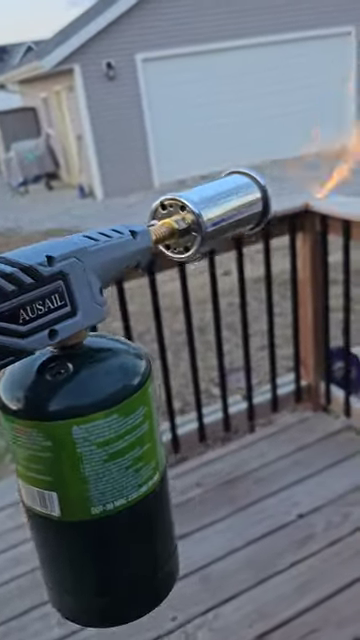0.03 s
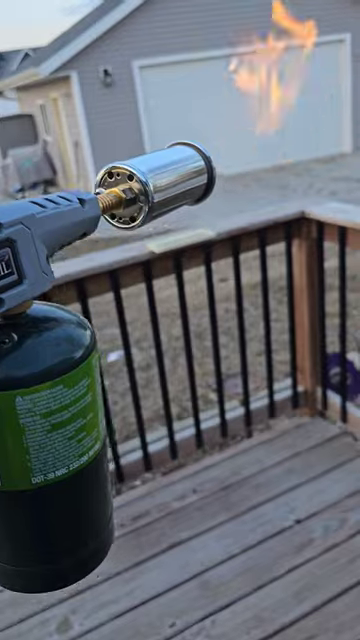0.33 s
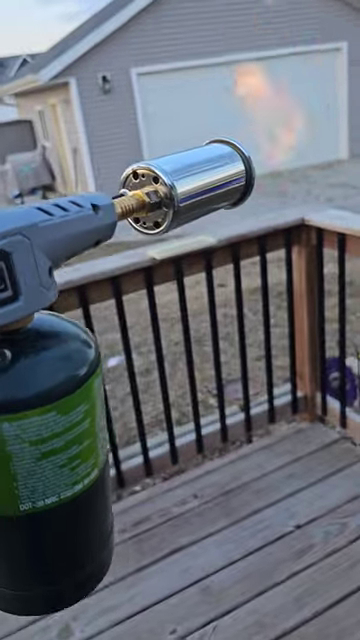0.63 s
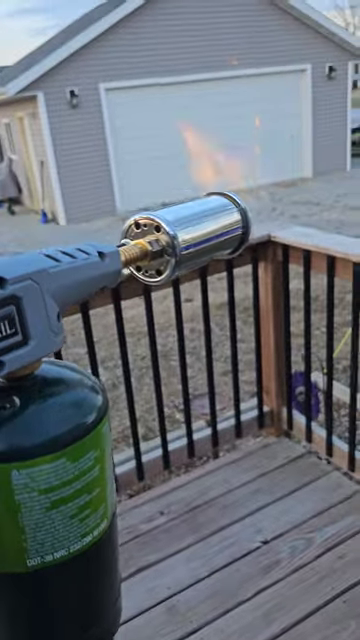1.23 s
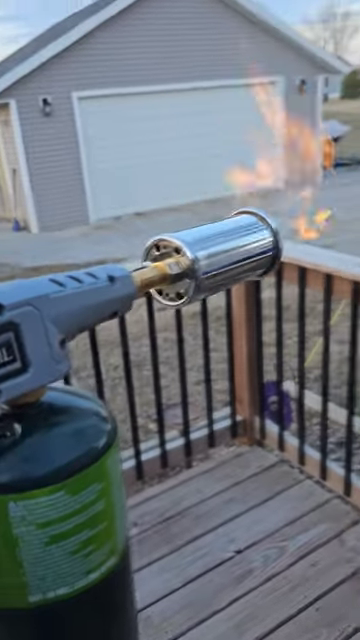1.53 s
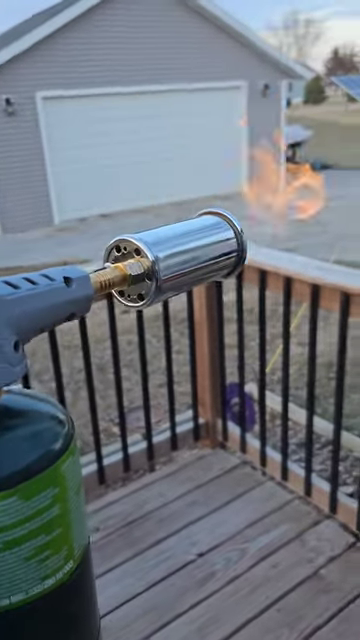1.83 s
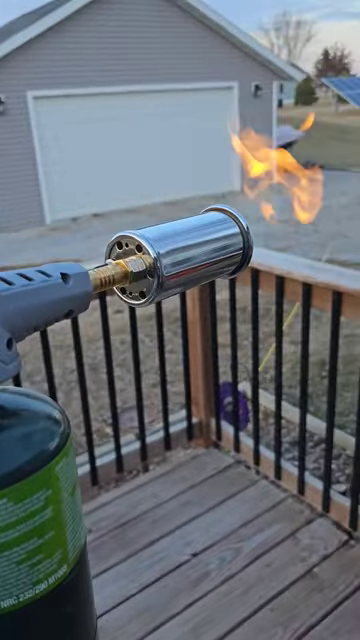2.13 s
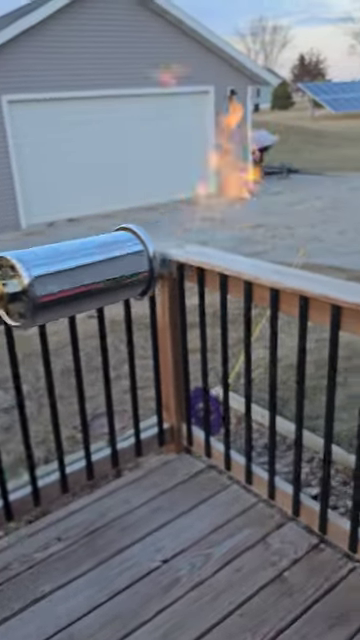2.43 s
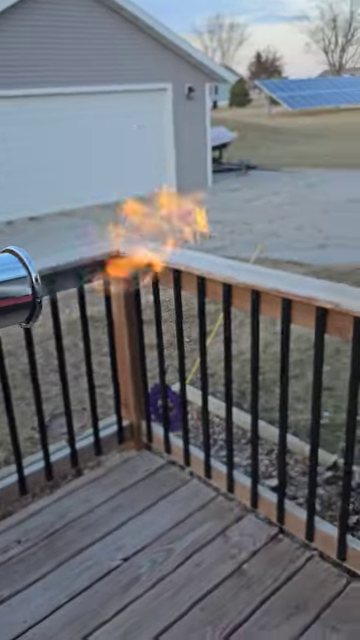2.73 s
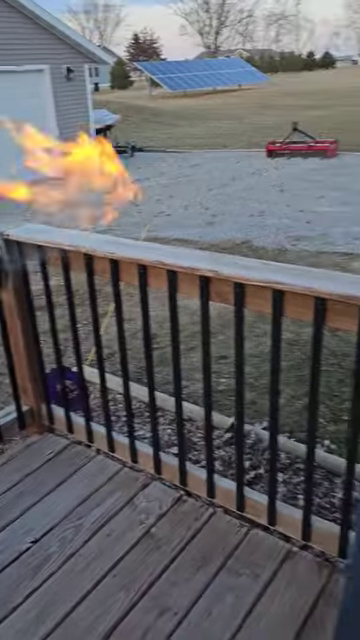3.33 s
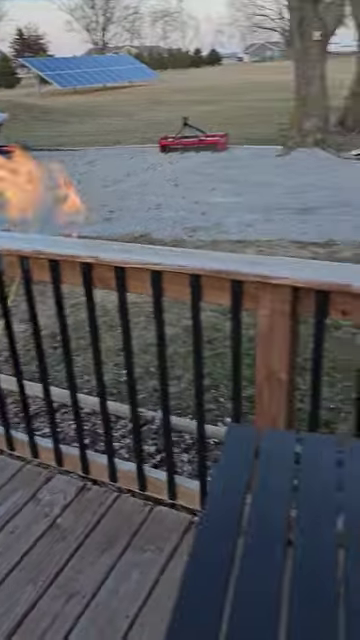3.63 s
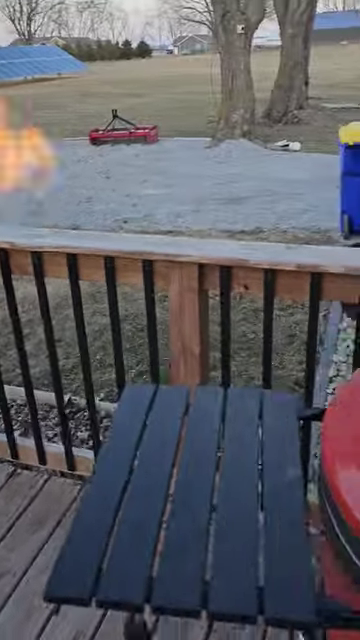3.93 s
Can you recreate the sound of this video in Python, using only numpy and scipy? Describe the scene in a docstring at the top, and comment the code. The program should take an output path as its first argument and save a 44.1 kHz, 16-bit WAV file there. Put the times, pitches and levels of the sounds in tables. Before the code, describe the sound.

A gas torch flame roars and flutters steadily on an open deck, popping softly now and then. Its jet hisses with a slight steel ring, growing brighter on the right as the microphone moves around it up close.

```python
"""Propane torch on a deck

A hand-held torch burns steadily in the open. The loose flame roars and flutters, with a small pop
now and then; on top, the gas jet hisses and rings the steel burner tube, and the boards add a faint
reflection. The microphone starts beside the burner and swings round it, opening up the treble on the right."""
import sys
import numpy as np
from scipy.fft import rfft, irfft, next_fast_len
from scipy.io import wavfile
from scipy.ndimage import map_coordinates

SR = 44100
rng = np.random.default_rng(int(sys.argv[2]) if len(sys.argv) > 2 else 0)


def pcm_store(signal):
    """Save signal as 16-bit PCM."""
    levels = np.round(np.clip(np.atleast_2d(signal), -1, 1) * 32767)
    wavfile.write(sys.argv[1], SR, levels.astype(np.int16).T)


N = 176400


# Fader ride of the roar: t/s, relative level/dB
ROAR_RIDE = [(0, -27.5), (.68, -27), (.78, -24), (.88, -26.5), (1.03, -23), (1.35, -22.5), (1.55, -22.5),
             (1.75, -25.5), (1.96, -26), (2.04, -28.5), (2.12, -27), (2.42, -24.5), (2.58, -23),
             (2.73, -25), (2.79, -29.5), (2.84, -23.5), (2.95, -24.5), (3.1, -26.5), (3.35, -28),
             (3.45, -25.5), (3.54, -26), (3.62, -23.5), (3.73, -23.5), (3.81, -24), (3.88, -24),
             (3.93, -28.5), (4, -22)]
# EQ of the roar: f/Hz, relative level/dB
ROAR_EQ = [(20, -25), (40, -6), (62, -1.5), (82, 3), (118, -3.5), (150, 2.5), (215, -1), (250, -2),
           (280, -2), (350, -7.5), (430, -18.5), (700, -28.5), (1500, -31.5), (3000, -65)]

def flame_roar(flutter, trim_db=-1, flutter_db=0.97):
    """The loose flame gives the low end: a deep, fluttering rumble, almost mono."""
    ride_db, = curves(ROAR_RIDE)
    rumble = noise(lambda hz: amp(along(ROAR_EQ, hz)))
    return amp(ride_db + trim_db + flutter_db * flutter) * rumble


# Fader ride of the turbulence at the burner mouth: t/s, relative level/dB
RUSH_RIDE = [(0, -36), (.3, -37.5), (.62, -36.5), (.78, -34.5), (.9, -35), (1.1, -31), (1.55, -34.5),
             (2.05, -36.5), (2.4, -33), (2.7, -32), (3.2, -35.5), (3.7, -30.5), (4, -33)]
# EQ of the rush: f/Hz, relative level/dB
RUSH_EQ = [(150, -52), (350, -8), (450, 3), (500, -2.5), (580, 2.5), (720, 2), (900, -5), (1100, 0),
           (1400, -15), (1800, -14.5), (4000, -25)]
# Stereo placement of the rush: f/Hz, right minus left/dB
RUSH_BALANCE = [(300, 46), (460, 0.5), (600, -9), (900, -5), (1200, -0.5)]

def burner_rush(flutter, trim_db=-1, flutter_db=2.05):
    """Burning gas tears out of the burner mouth and fills the midrange."""
    ride_db, = curves(RUSH_RIDE)
    return amp(ride_db + trim_db + flutter_db * flutter) * panned_noise(RUSH_EQ, RUSH_BALANCE)


# Cue list of the pops: t/s, peak before panning/dB, f/Hz
POP_CUES = [(.767, -13.5, 200), (2.2326, -22, 760), (2.606, -21, 160), (2.715, -15, 150), (2.822, -15, 111),
            (3.176, -24, 1500), (3.734, -15, 146), (3.883, -12.5, 128)]

def flame_pops():
    """A pocket of gas ignites: one push and pull of air."""
    out, t = np.zeros(N), np.arange(N) / SR
    for cue_s, peak_db, hz in POP_CUES:
        phase = 2 * np.pi * hz * (t - cue_s)
        out -= amp(peak_db) * phase * np.exp((1 - phase ** 2) / 2)
    return out * pan(db=1)


# EQ of the hiss, beside the burner and swung round: f/Hz, relative level/dB
BESIDE_EQ = [(500, -11.5), (1450, -2.5), (1800, -9.5), (2250, -8.5), (2850, 2.5), (3300, -9.5),
             (4100, -0.5), (4650, -10.5), (5600, -8), (6800, -18), (7900, -12), (9000, -18), (10300, -17.5),
             (12000, -13), (13800, -36.0), (15500, -29.5)]
ROUND_EQ = [(500, -13), (1450, -6), (1800, -24), (2250, -5.5), (2850, 2.5), (3300, -4), (4100, -4),
            (4650, -20), (5600, -3.5), (6800, -10), (7900, -6), (9000, -7), (10300, -10), (12000, -13.5),
            (13800, -29), (15500, -30.5)]
# Stereo placement from the same two angles: f/Hz, right minus left/dB
BESIDE_BALANCE = [(2000, -3.5), (2900, 6), (4400, 9), (5600, 4), (7500, -6), (10000, -7), (15000, -6.5)]
ROUND_BALANCE = [(2000, 0.5), (2900, 4.3), (4400, 0.5), (5600, 6.6), (7500, 10), (10000, 5.8), (15000, 4.0)]

def jet_hiss(blend, beside_db=-38, round_db=-39):
    """The gas jet's colour depends on the angle: an equal-power crossfade of two perspectives."""
    beside = amp(beside_db) * panned_noise(BESIDE_EQ, BESIDE_BALANCE)
    around = amp(round_db) * panned_noise(ROUND_EQ, ROUND_BALANCE)
    return np.sqrt(1 - blend) * beside + np.sqrt(blend) * around


# Resonances of the steel tube: f/Hz, width/Hz
TUBE_MODES = [(1080,110), (1212,75), (1300,65), (2528,70), (3582,95), (3925,95), (4330,130), (4987,85),
              (5840,145), (6040,135), (6322,90), (7515,85), (8335,150), (8871,70), (9400,190), (9930,145),
              (10912,150), (11660,125), (12600,135), (13470,140), (14740,230)]
# How each one radiates: relative level/dB (beside, halfway, round), right minus left/dB (beside, round)
MODE_RADIATION = [(-48,-44,-41.5,-2,3), (-38.5,-38.5,-37,0,2.5), (-47.5,-50,-37,0,-1.5),
                  (-43.5,-41,-49.5,11,2), (-38.5,-46,-60,-4,-1), (-41.5,-42.5,-44.5,6,-2),
                  (-55,-51,-57,-7,-3), (-56.5,-49.5,-50,-5,7), (-46.5,-48,-59,-8.5,-3),
                  (-50,-44.5,-48.5,6,14), (-45,-53,-42,10,17), (-43.5,-48,-46,27,23), (-40,-55,-44.5,7,21),
                  (-50,-65,-50.5,1.5,8), (-48,-51,-52,0,13), (-58,-66,-66,-4,6), (-47,-61.5,-46.5,6,12),
                  (-56,-50.5,-54.5,-5,19), (-62,-64,-61,-3,1), (-59,-63,-66,-6,7), (-53,-62,-63,5,4)]

def tube_ring(swing, trim_db=-0.5, correlation=0.66, waver_db=1.1, waver_hz=5.9):
    """The jet keeps the tube's resonances ringing; each wavers and radiates in its own direction."""
    out = np.zeros((2, N))
    for (centre, width), (*levels_db, pan_beside, pan_round) in zip(TUBE_MODES, MODE_RADIATION):
        ring = noise(lambda hz: resonance(hz, centre, width), [(centre, correlation)])
        level_db = np.interp(swing, [0, .5, 1], levels_db) + waver_db * wobble(waver_hz)
        pan_db = pan_beside + swing ** 2 * (pan_round - pan_beside)
        out += ring * amp(trim_db + level_db) * pan(pan_db)
    return out


def resonance(hz, centre, width):
    """Gain of one tube resonance: a peak with steep skirts."""
    detune = (hz - centre) / width
    return 1 / np.sqrt((1 + (2 * detune) ** 2) * (1 + (detune / 2.5) ** 2))


def deck_reflection(pair, echo_s=.0033, echo_db=-16, sway_s=0.0002, sway_hz=0.78):
    """The boards add a weak copy to each side: a light comb filter that drifts as the hand sways."""
    echoes = [delayed(side, echo_s + sway_s * wobble(sway_hz)) for side in pair]
    return pair + amp(echo_db) * np.array(echoes)


# Stereo width of flame and hiss: f/Hz, left-right correlation (0 wide, 1 mono)
STEREO_CORRELATION = [(100, 1), (300, .98), (600, 0.69), (1200, 1), (2000, 0.73), (3800, 1), (5000, 0),
                      (7000, 0), (10000, 0), (15000, 0)]

def noise(response, correlation=STEREO_CORRELATION):
    """Mid/side noise at rms 1 with a given colour and stereo width."""
    hz = np.fft.rfftfreq(N, 1 / SR)
    spread = np.arccos(np.clip(along(correlation, hz), 0, .992)) / 2
    mid, side = rfft(rng.standard_normal((2, N))) * [np.cos(spread), np.sin(spread)]
    pair = irfft(np.array([mid + side, mid - side]) * response(hz), N)
    return pair / np.sqrt(np.mean(pair ** 2) + 1e-20)


def panned_noise(eq, balance):
    """Noise through an EQ curve, panned frequency by frequency."""
    return noise(lambda hz: amp(along(eq, hz)) * pan(along(balance, hz)))


def amp(db):
    """Decibels to gain."""
    return 10 ** (np.asarray(db) / 20)


def pan(db):
    """Constant-power left and right gains for right minus left in dB."""
    gains = amp(np.array([-db, db]) / 2).reshape(2, -1)
    return gains / np.sqrt(np.mean(gains ** 2, axis=0))


def along(points, hz):
    """Read (f/Hz, value) breakpoints on a log frequency axis."""
    freqs, values = np.transpose(points)
    return np.interp(np.log(hz + 1), np.log(freqs + 1), values)


def curves(rows):
    """One automation curve for each column after the time."""
    times, *columns = np.transpose(rows)
    return [np.interp(np.arange(N) / SR, times, column) for column in columns]


def wobble(rate_hz):
    """A smooth random modulator with rate_hz knots a second."""
    return map_coordinates(rng.standard_normal(2048), [np.arange(N) * rate_hz / SR], mode="wrap")


def delayed(x, seconds):
    """A variable delay line."""
    return map_coordinates(x, [np.arange(N) - seconds * SR], order=5, mode="mirror")


# Microphone move: t/s, swing (0 beside the burner, 1 swung round), right-side lag/ms, jet gain/dB
MIC_MOVE = [(0.0, 0.12, 0.17, -3.5), (0.55, 0.0, 0.17, -3.5), (1.1, 0.25, 0.2, -2), (1.5, 0.25, 0.14, -1.0),
            (1.95, 0.58, 0.11, 0.5), (2.55, 0.6, 0.15, -1), (2.72, 0.97, 0.081, -0.5),
            (3.25, 0.97, 0.078, 0.5), (3.65, 0.93, 0.098, 1.5), (4.0, 0.98, 0.08, 0.5)]

def scene():
    """One flutter drives roar and rush together; the burner reaches the right side slightly late."""
    swing, lag_ms, jet_db = curves(MIC_MOVE)
    flutter = wobble(rate_hz=62.25)
    jet = (jet_hiss(blend=swing ** 2) + tube_ring(swing)) * amp(jet_db)
    left, right = deck_reflection(jet) + burner_rush(flutter)
    burner = np.array([left, delayed(right, lag_ms / 1000)])
    return flame_roar(flutter) + flame_pops() + burner


def record(dry, top_hz=15550):
    """A brick-wall low-pass on the whole mix."""
    padded = next_fast_len(N + SR // 8)
    passband = np.fft.rfftfreq(padded, 1 / SR) < top_hz
    return irfft(rfft(dry, padded) * passband, padded)[..., :N]


dry = scene()
out = record(dry)
pcm_store(out)
```